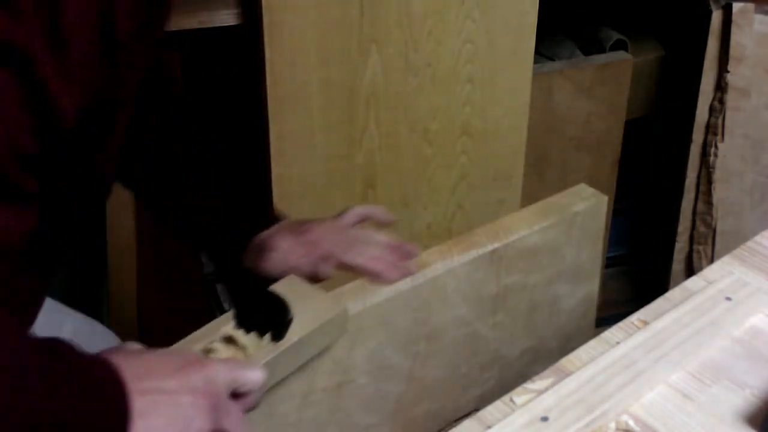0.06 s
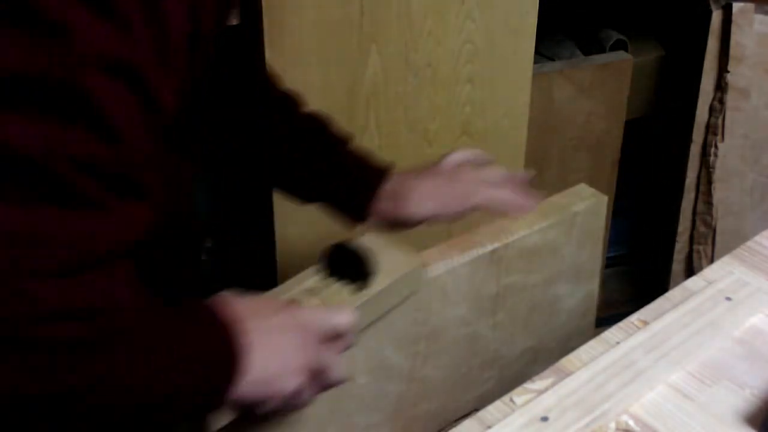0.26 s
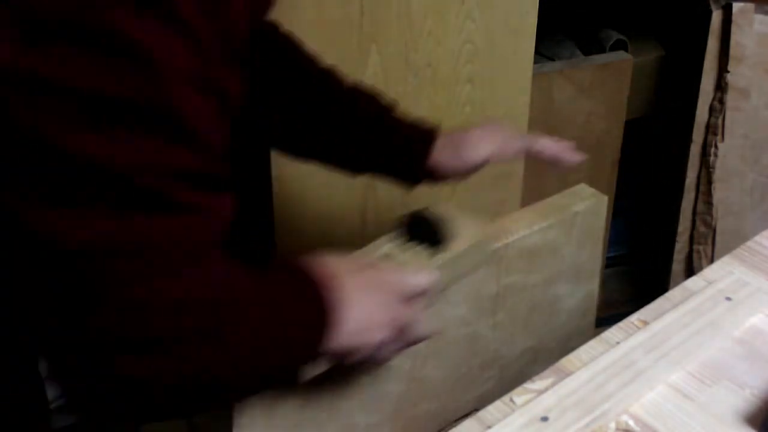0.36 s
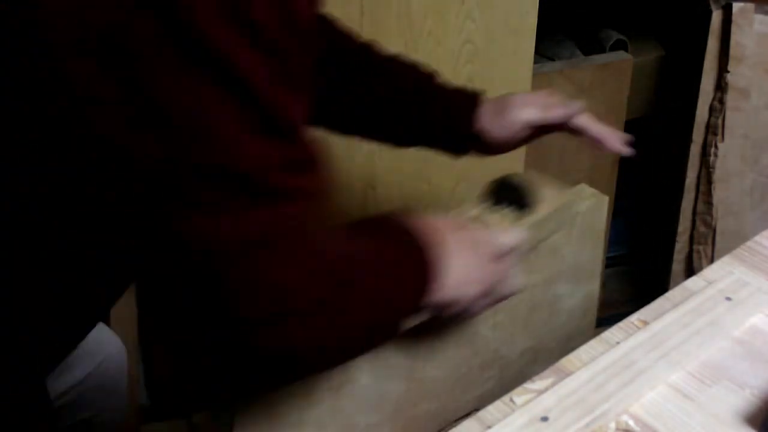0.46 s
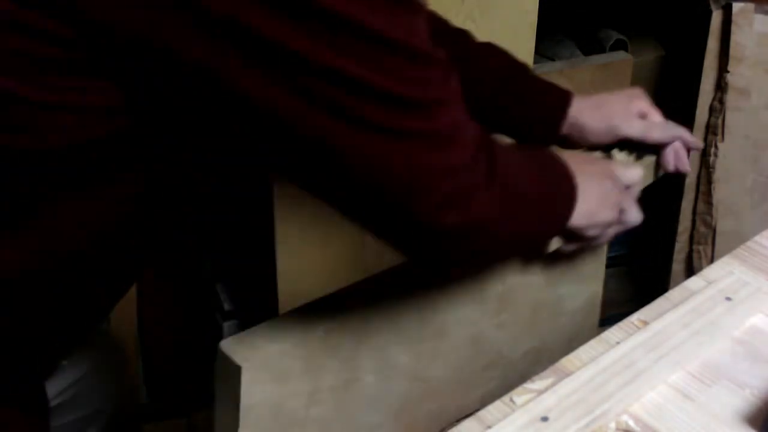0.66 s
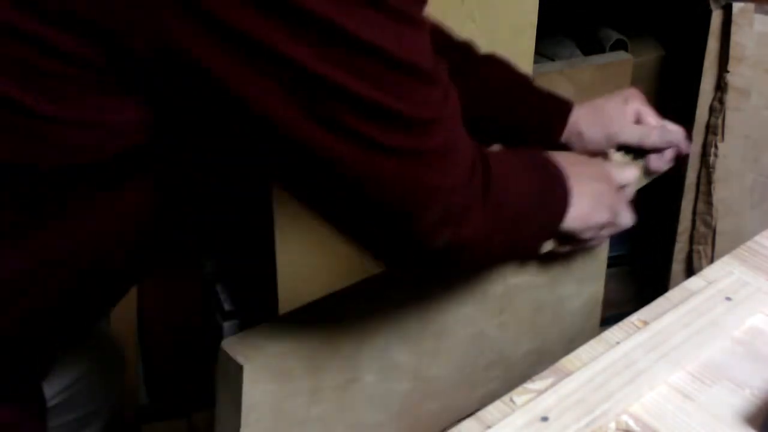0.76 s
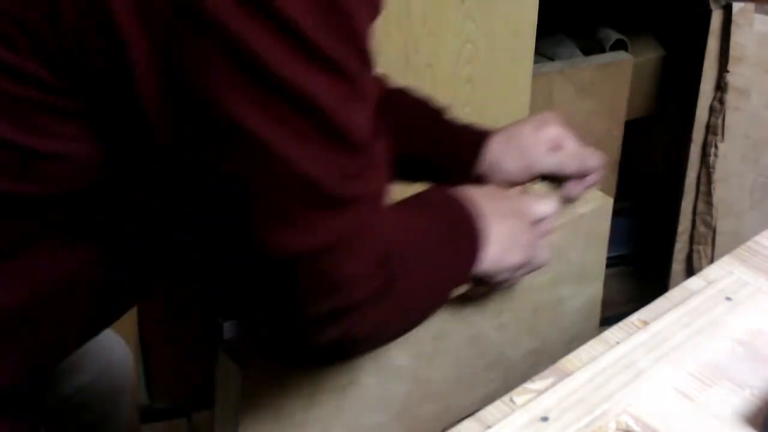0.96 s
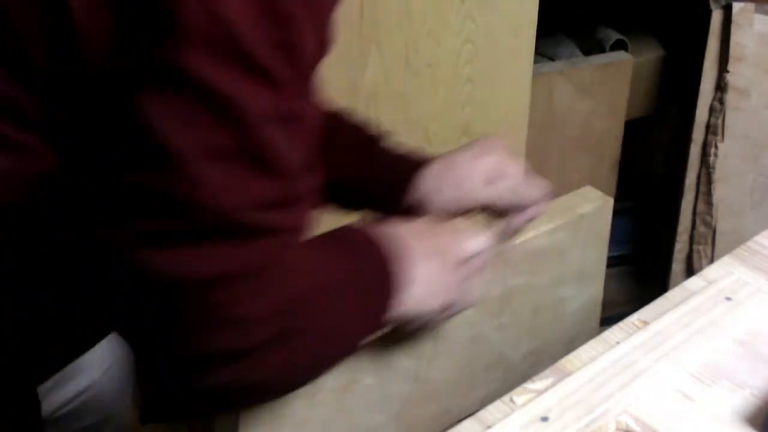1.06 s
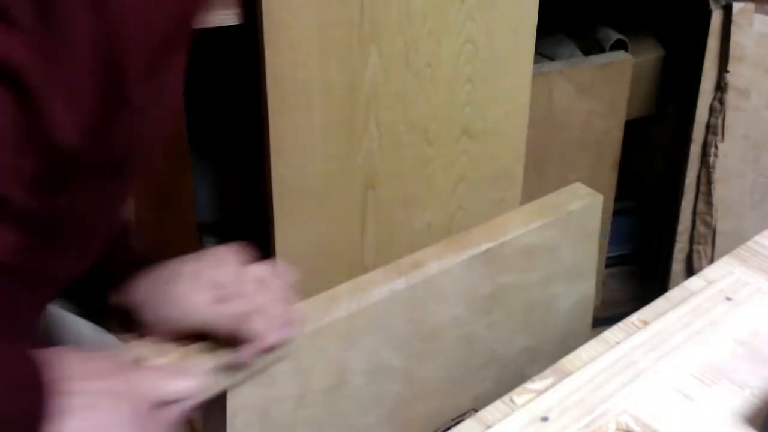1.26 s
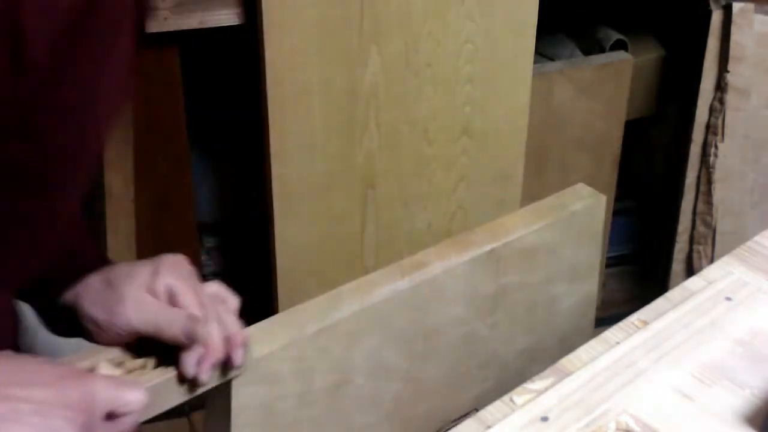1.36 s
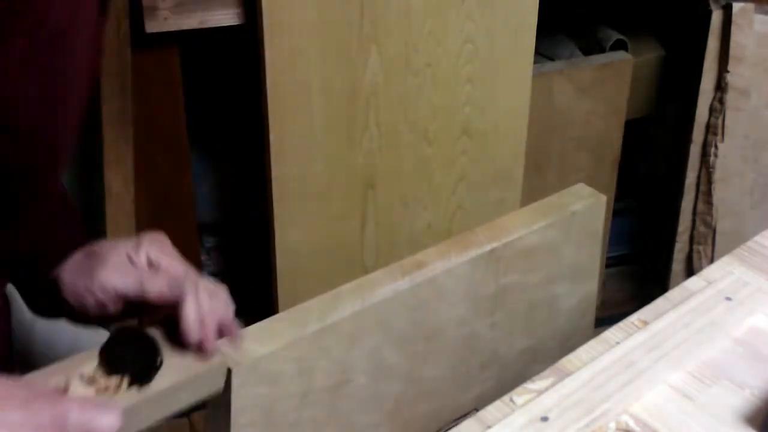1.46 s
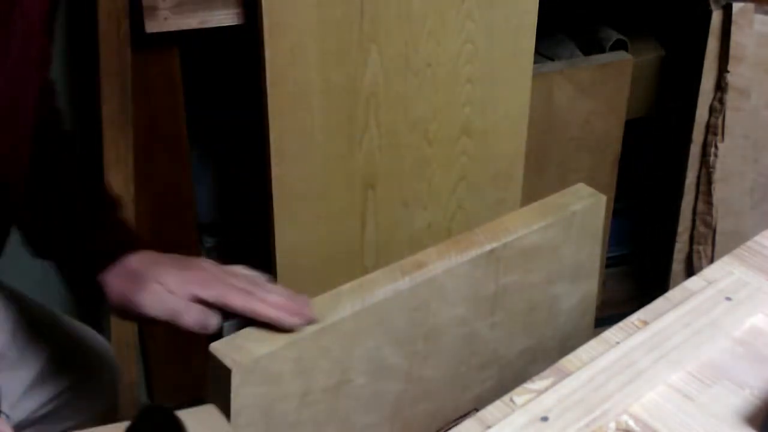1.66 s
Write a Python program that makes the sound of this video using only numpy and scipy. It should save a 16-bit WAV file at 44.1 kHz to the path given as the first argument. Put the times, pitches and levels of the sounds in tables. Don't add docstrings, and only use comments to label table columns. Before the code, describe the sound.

A hand plane scrapes along a wooden board edge, knocking once, then rasps in a stronger stroke

```python
import sys
import numpy as np
from scipy import signal
from scipy.io import wavfile

SR = 44100
rng = np.random.default_rng(int(sys.argv[2]) if len(sys.argv) > 2 else 0)


def rack_gain(trim_db):
    fader = np.asarray(trim_db, float)
    return 10 ** (fader / 20)


def pcm_store(signal):
    levels = np.round(np.clip(np.atleast_2d(signal), -1, 1) * 32767)
    wavfile.write(sys.argv[1], SR, levels.astype(np.int16).T)


N = 74970


def rms_one(x):
    return x / np.sqrt(np.mean(x ** 2) + 1e-20)


def in_time(rows):
    s, *columns = np.transpose(rows)
    return [np.interp(np.arange(N) / SR, s, c) for c in columns]


def drift(rate_hz):
    r = np.exp(-2 * np.pi * rate_hz / SR)
    slow = signal.lfilter([1], [1, -2 * r, r * r], rng.standard_normal(N + SR))
    return rms_one(slow[SR:])


def grains(per_s, spread_db):
    size = rack_gain(spread_db * np.minimum(rng.exponential(1, N), 5.0))
    size = size * rng.choice([-1, 1], N)
    return size * (rng.random(N) < per_s / SR) + 1e-18


def ring(x, hz, t60):
    r = 1000 ** (-1 / (t60 * SR))
    w = 2 * np.pi * hz / SR
    return signal.lfilter([0, np.sin(w)], [1, -2 * r * np.cos(w), r * r], x)


def peak(hz, width_hz):
    r = np.exp(-np.pi * width_hz / SR)
    feedback = [1, -2 * r * np.cos(2 * np.pi * hz / SR), r * r]
    return (1 - r * r) / 2 * np.array([1, 0, -1]), feedback


def coloured(sources, spectrum, patchy_db):
    hz, level = np.transpose(spectrum)
    bands = int(3 * np.log2(hz[-1] / hz[0]))
    edges = np.geomspace(hz[0], min(hz[-1], .45 * SR), bands + 1)
    out = 0
    for k, (low, high) in enumerate(zip(edges, edges[1:])):
        band_pass = signal.butter(2, [low, high], "band", fs=SR, output="sos")
        band = signal.sosfilt(band_pass, sources[k % 2])
        band_db = np.interp(np.log(low * high) / 2, np.log(hz), level)
        out = out + band * rack_gain(band_db + patchy_db * drift(14.5))
    return rms_one(out)


def workshop_air():
    # f/Hz, level/dB
    air_colour = [(88, -40), (150, -16), (209, 23), (1220, 11.5), (2400, 3), (5760, -3.5), (10900, 0),
                  (15500, -6)]
    # f/Hz, level/dB
    rumble_colour = [(22, -10), (40, -20), (63, -9), (90, -12), (160, -11)]
    air = rack_gain(-62.5) * coloured(rng.standard_normal((2, N)), air_colour, patchy_db=-1.5)
    rumble = rack_gain(-64) * coloured(rng.standard_normal((2, N)), rumble_colour, patchy_db=-2.0)
    return air + rumble


def sole():
    # t/s, level/dB, centre f/Hz of the thin band
    push_slide = [
        (0.015, -68.5, 10400),
        (0.035, -63.5, 11000),
        (0.225, -46, 10700),
        (0.337, -44.5, 10500),
        (0.489, -51, 11500),
        (0.58, -54, 10000),
    ]
    # t/s, level/dB, centre f/Hz
    settle_slide = [
        (0.6, -58.5, 10200),
        (0.644, -47.5, 10450),
        (0.715, -55.5, 10400),
        (0.724, -48.5, 10600),
        (0.802, -44.5, 10300),
        (0.832, -57, 10400),
        (0.88, -73, 10500),
        (0.93, -68, 10000),
    ]
    # t/s, level/dB, centre f/Hz
    pull_slide = [
        (0.95, -56.5, 10400),
        (0.976, -41.5, 10200),
        (0.996, -39.5, 10400),
        (1.11, -35.5, 10600),
        (1.28, -32, 10260),
        (1.334, -38, 10600),
        (1.357, -33, 10700),
        (1.405, -29.5, 10500),
        (1.42, -42, 10500),
    ]
    # t/s, level/dB, centre f/Hz
    run_out_slide = [
        (1.44, -47.5, 11100),
        (1.54, -49.5, 11050),
        (1.61, -61, 11400),
        (1.668, -68.5, 10900),
        (1.7, -81, 11000),
    ]
    # t/s, bandwidth/Hz
    seat_width = [
        (0.0, 1690),
        (.38, 1950),
        (.44, 800),
        (.56, 900),
        (.85, 1200),
        (.97, 1960),
        (1.41, 1900),
        (1.45, 900),
        (1.7, 1100),
    ]
    # f/Hz, level/dB per Hz
    slide_colour = [(59, -48), (100, -13), (541, -2), (2370, -6), (2800, -6), (4280, -2.5), (9140, -5),
                    (11300, -6), (14000, -32), (15700, -40)]
    level_db, centre = in_time(push_slide + settle_slide + pull_slide + run_out_slide)
    width = in_time(seat_width)[0]
    grit = [grains(6700, 2.5) for _ in range(3)]
    thin, state = np.zeros(N), np.zeros(2)
    for i in range(0, N, 256):
        thin[i:i + 256], state = signal.lfilter(*peak(centre[i], width[i]), grit[2][i:i + 256], zi=state)
    press_db = np.maximum(level_db + 50, 0)
    broad = rack_gain(-2) * coloured(grit, slide_colour, patchy_db=0.0)
    hiss = broad + rack_gain(3 - 0.1 * press_db) * rms_one(thin)
    return rack_gain(level_db + 0.56 * drift(35.0)) * hiss


def body(x):
    t60_s, share, change_s = .06, .4, .06
    hop, t = int(change_s * SR), np.arange(SR // 7) / SR
    x = np.pad(x, (hop, 2 * hop))
    wet = np.zeros(N + SR)
    fade = np.sin(np.pi / 2 * np.arange(2 * hop) / hop)
    for i in range(0, N + hop, hop):
        tail = rng.standard_normal(len(t)) * 1000 ** (-t / t60_s)
        rung = signal.fftconvolve(x[i:i + 2 * hop] * fade, tail / np.sqrt(np.sum(tail ** 2)))
        wet[i:i + len(rung)] += rung
    return np.sqrt(1 - share) * x[hop:hop + N] + np.sqrt(share) * wet[hop:hop + N]


def reverberation(x):
    t60_s, wall_cut_hz = 0.47, 7800
    out, dull = np.zeros(N), np.exp(-2 * np.pi * wall_cut_hz / SR)
    for k, lag in enumerate((rng.uniform(.012, .04, 10) * SR).astype(int)):
        loop, state = x.copy(), [0.]
        gain = 1000 ** (-lag / SR / t60_s)
        for i in range(lag, N, lag):
            back, state = signal.lfilter([gain * (1 - dull)], [1, -dull], loop[i - lag:i], zi=state)
            loop[i:i + lag] += back[:N - i]
        out += (loop - x) * (-1) ** k
    return out


def shapes(rows):
    sag_db_per_s, release_db_per_s = 131, 487
    s, db, rise, hold, _ = np.transpose(rows)[:, :, None]
    u = np.arange(N) / SR - s
    fall = sag_db_per_s * np.clip(u, 0, rise + hold)
    fall = fall + release_db_per_s * np.maximum(u - rise - hold, 0)
    return np.clip(u / rise, 0, 1) * rack_gain(db - np.minimum(fall, 150))


def board():
    # t/s, level/dB, rise/s, hold/s, favoured f/Hz
    bumps = [(0.1884, -30, .002, 0.07, 496), (0.319, -43, 0.00092, 0.1, 710),
             (0.515, -34.5, 0.014, 0.047, 604), (0.575, -47, 0.011, 0.17, 600),
             (0.758, -37, 0.031, 0.023, 900), (0.797, -46.5, 0.0066, 0.023, 910),
             (0.867, -47, 0.0014, 0.0034, 566), (0.996, -39.5, 0.0064, 0.05, 910),
             (1.114, -56, 0.027, 0.026, 810), (1.381, -43, 0.013, 0.0082, 930),
             (1.296, -39.5, 0.031, 0.05, 403), (1.422, -44, 0.016, 0.15, 440)]
    # t/s, level/dB, rise/s, hold/s, mode f/Hz
    notes = [(.199, -29.5, 0.00063, 0.047, 1305), (.2, -43, 0.0007, 0.0086, 2320),
             (.201, -36.5, 0.0015, 0.072, 550), (0.452, -38.5, 0.048, 0.068, 564),
             (0.633, -26.5, 0.024, 0.024, 1430), (0.656, -28.5, 0.0042, 0.052, 707),
             (0.659, -34, 0.0063, 0.044, 436), (0.728, -30.5, 0.0058, 0.011, 3300),
             (0.729, -38, 0.0053, 0.011, 1410), (0.76, -57, .02, 0.029, 199),
             (1.417, -51, 0.012, 0.015, 199), (1.46, -39.5, 0.065, 0.082, 450)]
    knock_s = [.1986, .327, .533, .6655]
    # level/dB, favoured f/Hz
    knocks = [
        (-5.5, 460),
        (-15.5, 1130),
        (-11.5, 1300),
        (-21, 700),
    ]
    # f/Hz, level/dB, t60/s
    board_modes = [(130, -15, .1), (199, -2, .12), (262, -4, .1), (302, -4, .1), (380, -9, .08),
                   (455, -5, .09), (575, -3, .08), (655, -4, .08), (790, -5, .06), (1010, -4, .07),
                   (1380, -7, .06), (1560, -13, .07), (2320, -10, .04), (3130, -13, .03)]
    shape = np.vstack([shapes(bumps), shapes(notes)])
    shape = shape * (np.arange(N) > knock_s[0] * SR)
    favoured = np.array(bumps + notes)[:, 4]
    narrow = np.array([2.5] * len(bumps) + [220] * len(notes))
    contacts = [rms_one(grains(570, 2.9)) + .5 * rng.standard_normal(N) for _ in range(3)]
    out = 0
    for k, (hz, db, t60) in enumerate(board_modes):
        reach = rack_gain(db - narrow * np.log2(hz / favoured) ** 2)
        push = contacts[k % 3] * (reach @ shape) + 1e-18
        for s, (hit_db, hit_hz) in zip(knock_s, knocks):
            hit = rack_gain(hit_db + db - 3 * np.log2(hz / hit_hz) ** 2)
            push[int(s * SR)] += (-1) ** (k // 4) * hit
        out = out + ring(push, hz, t60) / np.sqrt(t60 * SR)
    high_pass = signal.butter(4, 135, "high", fs=SR, output="sos")
    return rack_gain(9.5) * signal.sosfilt(high_pass, out)


def taps():
    # t/s, peak level/dB, f/Hz, rise/s, t60/s
    tap_rows = [(.3275, -34.5, 630, 0.0016, 0.038), (.3275, -43, 2280, .001, .04),
                (0.334, -36.5, 1008, .003, 0.044), (.352, -37, 416, 0.007, 0.1),
                (.524, -31.5, 1012, 0.013, 0.013), (.527, -39, 571, 0.015, 0.078),
                (.53, -46, 196, 0.018, 0.11), (.656, -33.5, 192, 0.016, 0.086),
                (.659, -31, 656, 0.0054, 0.073), (.685, -30, 618, 0.0077, 0.021),
                (.698, -30.5, 660, 0.0066, 0.066), (.683, -35, 297.5, .02, 0.074),
                (0.784, -43, 1245, 0.016, 0.028), (.8145, -34, 895, 0.00081, .035),
                (.822, -41, 980, 0.0067, 0.077), (0.816, -41.5, 313.7, 0.0042, 0.16),
                (.868, -43, 623, 0.0055, 0.027), (1.02, -36.5, 194.5, 0.015, 0.054),
                (1.044, -27, 218, 0.0075, 0.024), (1.06, -35.5, 246, 0.011, 0.023),
                (1.02, -36.5, 879, 0.018, 0.062), (1.168, -44.5, 131.4, 0.022, 0.19),
                (1.35, -44, 1100, 0.018, 0.083), (1.365, -35, 1492, 0.031, 0.054),
                (1.385, -42, 984, 0.017, 0.04), (1.46, -37.5, 626, 0.0052, 0.065),
                (1.491, -44, 1545, 0.042, 0.069), (1.495, -42, 508, 0.01, 0.084),
                (.199, -32.5, 600, 0.002, 0.073), (.23, -37, 546, 0.013, .08),
                (.265, -38.5, 456, 0.018, 0.11), (.52, -39, 1313, 0.01, .04),
                (.522, -40.5, 758, 0.0092, 0.093), (.58, -44, 792, 0.012, 0.043),
                (1.008, -36.5, 165, 0.016, 0.043), (1.125, -39.5, 810, 0.021, 0.052),
                (1.11, -36, 1680, 0.054, 0.11), (1.225, -34, 1685, 0.011, 0.086),
                (1.468, -44.5, 1625, 0.012, .05), (1.4, -44, 190, 0.023, 0.082)]
    waver_rad, flutter_db = .7, 2.5
    s, db, hz, rise, t60 = np.transpose(tap_rows)[:, :, None]
    u = np.maximum(np.arange(N) / SR - s, 0)
    press = np.sin(np.pi / 2 * np.minimum(u / rise, 1))
    swell = press * 1000 ** (-np.maximum(u - rise, 0) / t60)
    unsteady = np.array([drift(36.0) for _ in range(4)])[np.arange(len(tap_rows) + 1) % 4]
    tone = np.sin(2 * np.pi * hz * u + waver_rad * unsteady[:-1])
    return np.sum(rack_gain(db + flutter_db * unsteady[1:]) * swell * tone, axis=0)


def bench():
    # t/s, level/dB
    shoves = [
        (0.201, -51.5),
        (0.312, -51),
        (0.861, -63),
        (1.014, -44),
        (1.292, -59),
        (1.387, -48.5),
    ]
    bench_hz = (57, 66, 107)
    t60_s, shove_s = 0.4, 0.015
    push = np.zeros(N)
    for s, db in shoves:
        push[int(s * SR)] = rack_gain(db)
    soft = np.hanning(int(shove_s * SR))
    push = np.convolve(push, soft / soft.sum())[:N] + 1e-18
    return sum(ring(push, hz, t60_s) for hz in bench_hz)


def blade():
    # t/s of the middle, level/dB, half length/s
    brushes = [(0.365, -42, 0.026), (0.62, -51.5, 0.16), (0.812, -45.5, 0.035), (1.523, -52, 0.044),
               (0.331, -43, .008), (0.534, -54.5, .012), (0.922, -61, 0.051)]
    # t/s, level/dB, brightness/dB (finer fibres sound higher)
    cut = [
        (1.005, -36, 9),
        (1.014, -33, 2.2),
        (1.166, -26.5, 4.5),
        (1.196, -39.5, 14),
        (1.238, -32.5, 14),
        (1.344, -60, 13.5),
        (1.396, -38.5, -3),
        (1.451, -47, -1),
    ]
    # f/Hz, level/dB per Hz
    cut_colour = [(180, -27), (300, -26.5), (1020, -3.5), (1440, -3.5), (1630, -5.5), (1960, -6.5),
                  (2920, -5), (9000, -20), (11700, -18), (19800, -120)]
    # f/Hz, bandwidth/Hz, level/dB
    iron_modes = [(1698, 39, 14), (2555, 32, 7), (2804, 11, 8.5), (3013, 110, 13.5), (3200, 29, -4),
                  (3725, 13, 4), (4700, 49, -14), (4210, 36, 0.5), (5100, 360, -1), (5840, 53, 10),
                  (6270, 29, -4), (5980, 120, 1.5)]
    first_s, last_s = cut[0][0], cut[-1][0]
    onset = [(first_s - .06, -75, 0), (first_s - .006, -46, 0)]
    ending = [(last_s + 0.098, -70, 0), (last_s + 0.13, -100, 0)]
    level_db, bright_db = in_time(onset + cut + ending)
    snaps = [grains(5000, 2.35) for _ in range(2)]
    iron = 0
    for k, (hz, width, db) in enumerate(iron_modes):
        rung = signal.lfilter(*peak(hz, max(width, 45.0)), snaps[k % 2])
        iron = iron + rack_gain(db + 0.84 * drift(2.8)) * rms_one(rung)
    rasp = coloured(snaps, cut_colour, patchy_db=1.5) + rack_gain(-9.5) * rms_one(iron)
    dull = signal.lfilter(*signal.butter(2, 3000, fs=SR), rasp)
    rasp = rasp + (rack_gain(-0.26 * bright_db) - 1) * dull
    low = signal.lfilter(*signal.butter(1, 6160, fs=SR), rasp)
    tilted = rack_gain(-bright_db) * low + rack_gain(bright_db) * (rasp - low)
    t = np.arange(N) / SR
    light = sum(rack_gain(db) * np.exp(-((t - s) / half) ** 2) for s, db, half in brushes)
    return (rack_gain(level_db + 0.5) + light) * rack_gain(0.15 * drift(25.0)) * tilted


def scene():
    work = body(sole() + blade()) + board() + taps() + bench()
    return (work + rack_gain(-20.5) * reverberation(work) + workshop_air())[None]


def roll_off(x):
    return signal.sosfilt(signal.butter(12, 15640, fs=SR, output="sos"), x)


def record(dry):
    low_pass = signal.cheby2(10, 40, 16600, fs=SR, output="sos")
    mix = signal.sosfilt(low_pass, dry)
    return roll_off(mix)


dry = scene()
out = record(dry)
pcm_store(out)
```